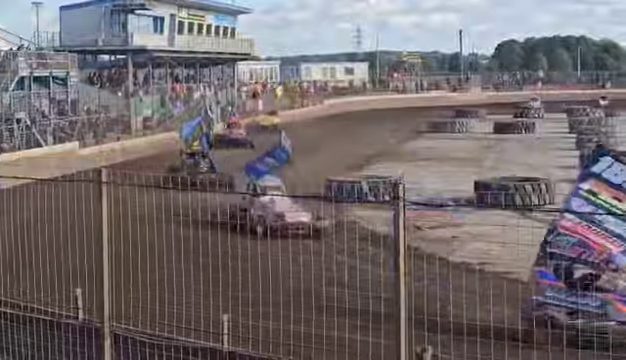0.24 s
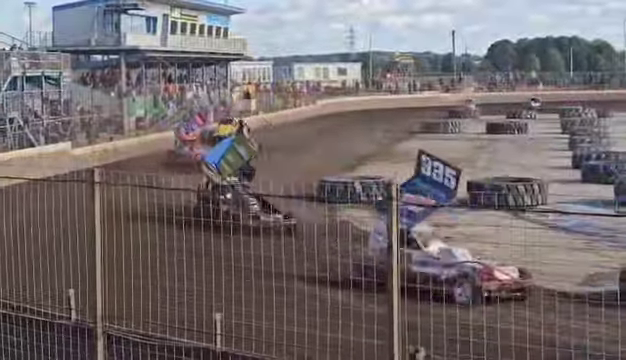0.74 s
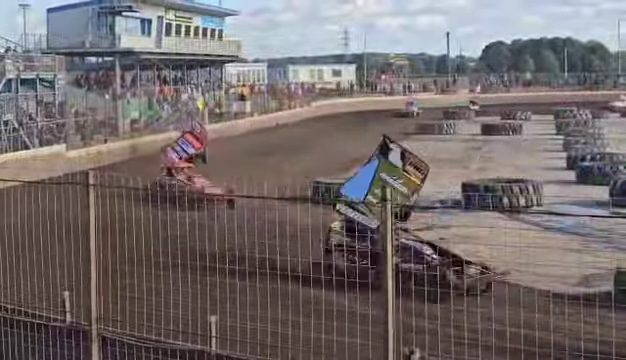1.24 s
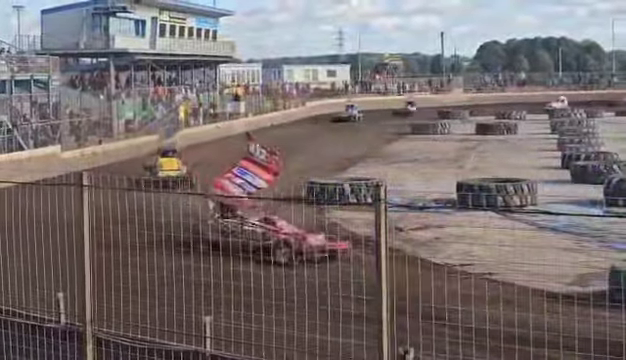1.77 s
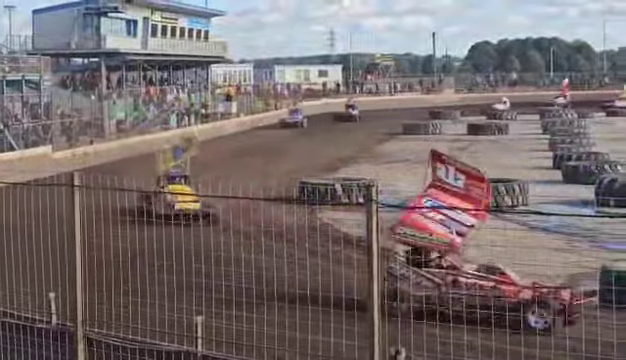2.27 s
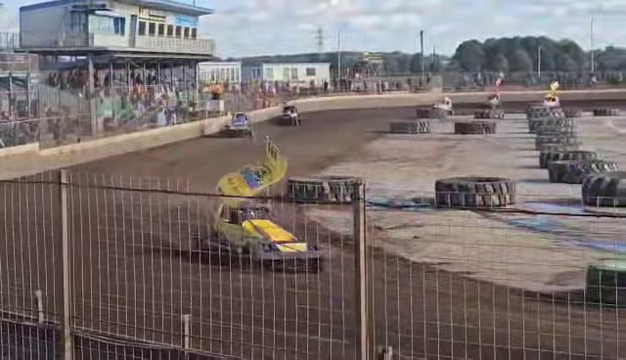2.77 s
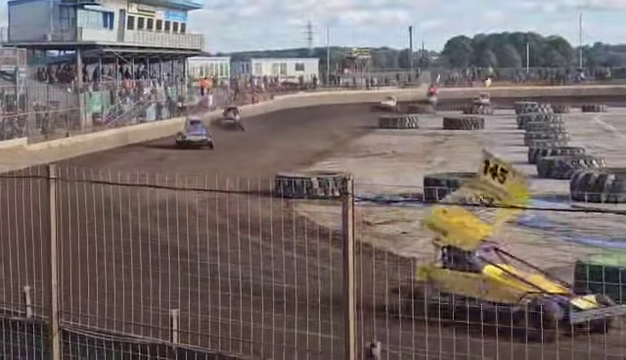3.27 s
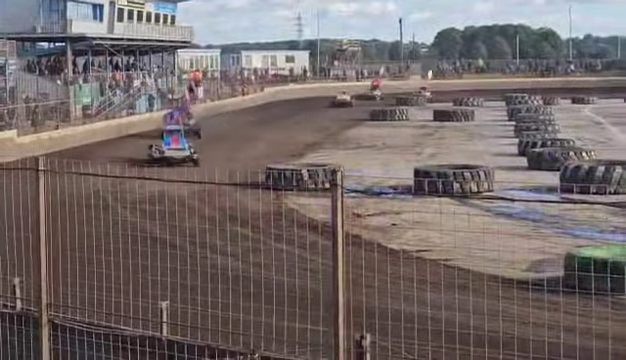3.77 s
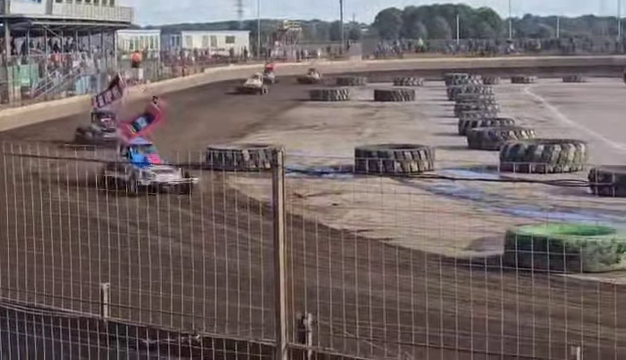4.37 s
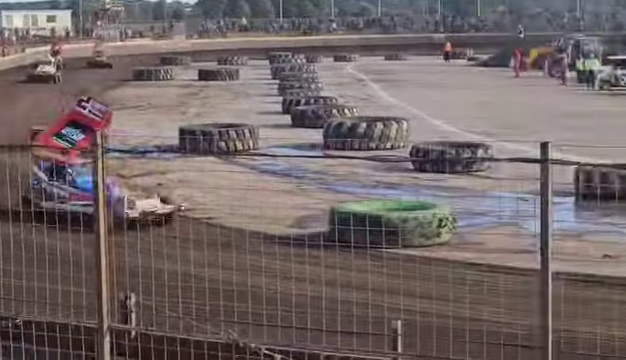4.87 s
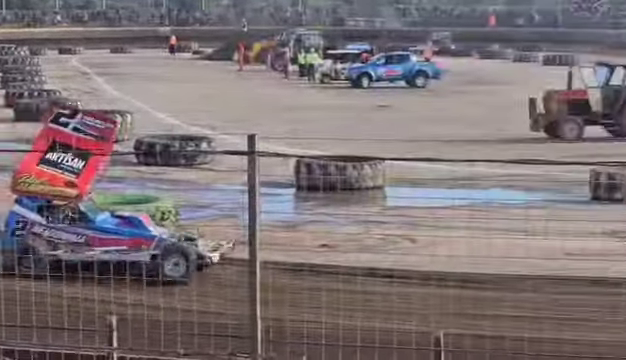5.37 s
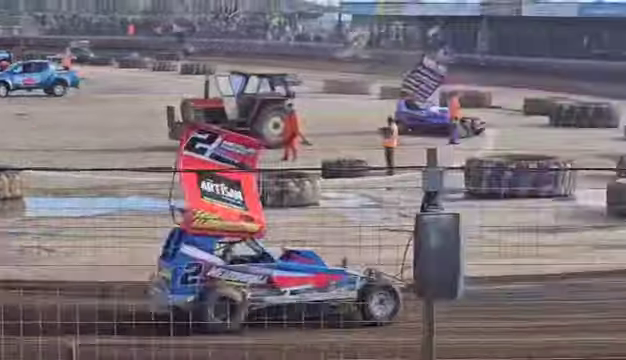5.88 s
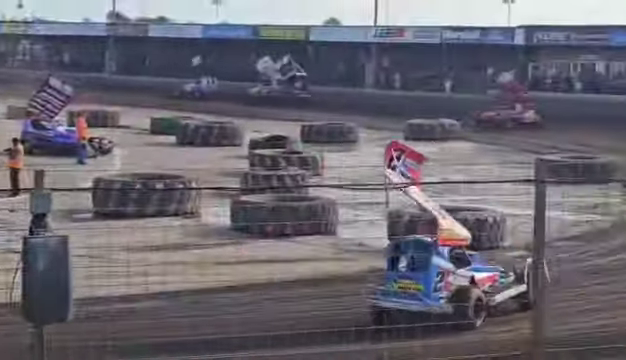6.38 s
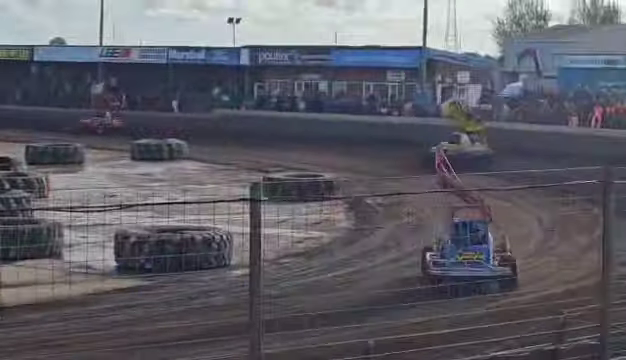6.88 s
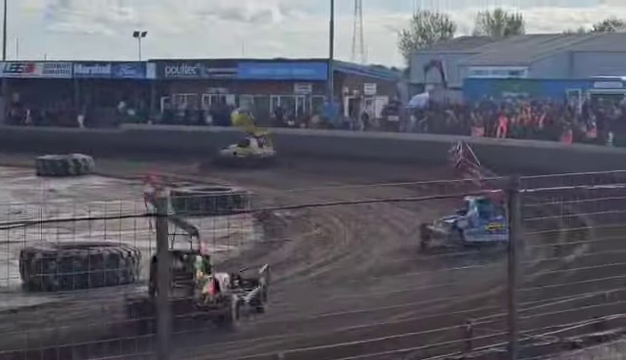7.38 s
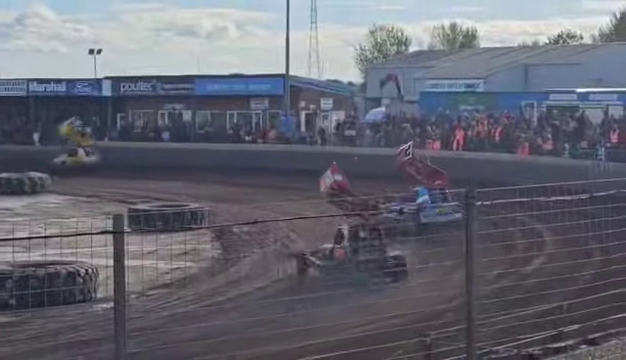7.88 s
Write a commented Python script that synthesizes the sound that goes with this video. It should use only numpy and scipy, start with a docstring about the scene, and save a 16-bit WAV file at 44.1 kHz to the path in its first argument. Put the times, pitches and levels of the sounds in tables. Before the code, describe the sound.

Loud V8 stock cars roar past one after another on a dirt oval, over the pack's steady drone, with hissing soil and stones ticking on a wire fence.

```python
"""First a V8 roars by against the drone of the pack: stock cars on a dirt oval, from behind the fence.
Eight cars come down the straight in turn, each a train of uneven firing pulses through its exhaust.
Many distant engines make the pack; close by, pulsed gas rasps and tyres throw hissing soil and grit.
Single stones tick on the wire, partials and low beats ring out, and the stands return a dull echo.
Two microphone ports hear it, with each engine reaching the nearer one first."""
import sys
import numpy as np
from scipy import signal
from scipy.fft import rfft, irfft, next_fast_len
from scipy.io import wavfile
from scipy.ndimage import uniform_filter1d, map_coordinates

SR = 44100
rng = np.random.default_rng(int(sys.argv[2]) if len(sys.argv) > 2 else 0)


def store_pcm(level_fs):
    """Save levels as 16-bit WAV."""
    pcm = np.round(np.clip(level_fs, -1, 1) * 32767).astype(np.int16)
    wavfile.write(sys.argv[1], SR, np.atleast_2d(pcm).T)


N = 358974

# near cars with both a note and ringing partials: [t/s, firing rate f/Hz, level/dB]
CAR_B = [(0, 243, -24), (0.55, 250, -18.5), (1.1, 230, -24), (1.3, 240, -19), (1.45, 212, -18),
         (1.62, 219, -19), (1.78, 255, -14.5), (1.92, 282, -19), (2.1, 291, -22)]
CAR_C = [(1.95, 358, -29), (2.17, 362, -25), (2.27, 413, -26), (2.37, 450, -25), (2.45, 432, -26),
         (2.53, 411, -31)]
CAR_D = [(2.15, 222, -19.5), (2.32, 245, -17), (2.5, 228, -21), (2.65, 245, -16.5), (2.78, 222, -19),
         (2.98, 222, -18.5), (3.15, 237, -21.5), (3.55, 228, -20.5), (3.78, 243, -16), (3.95, 232, -21)]
CAR_E = [(4.1, 224, -21), (4.3, 214, -20.5), (4.68, 214, -15), (5.12, 244, -15), (5.3, 233, -17.5),
         (5.55, 236, -17), (5.7, 243, -21)]
CAR_H = [(7.05, 408, -24), (7.3, 420, -22), (7.53, 382, -21), (7.68, 408, -21), (7.85, 421, -21),
         (8.14, 422, -21)]
# exhaust spectrum of a muffled car, near or far: [f/Hz, level/dB per Hz]
MUFFLED = [(30, -27), (60, -13.5), (95, -5.5), (140, 3), (235, 4.5), (320, -5.5), (480, -18), (800, -27.5),
           (1500, -36), (3000, -64), (10000, -87)]


def car(rows, pipe, abreast_s, snarl_db, jitter, uneven=0.4, scatter_db=0.1, tune=1,
        half_s=0.074, reach_s=0.9, mouth=None):
    """One near car: exhaust note plus snarl, and its bare firing pulses, strongest when abreast."""
    # usual resonances of the open pipes: [f/Hz, level/dB]
    open_mouth = [(330, -26), (470, 0), (650, -7), (850, -2), (1030, 2), (1220, -10), (1420, 0), (1600, -7),
                  (1850, -17), (2200, -13), (2800, -21), (4500, -16), (12000, -36)]
    if mouth is None:
        mouth = open_mouth
    hz, db = curves(rows)
    unsteady_hz = hz * (1 + 0.0025 * wobble(18))
    pulses = firings(unsteady_hz, uneven, scatter_db, jitter)
    flutter_db = 1.1 * wobble(16)
    note = amp(db + flutter_db) * levelled(ring(pulses, pipe)[0])
    exhaust = note + amp(snarl_db) * snarl(pulses, abreast_s, tune, half_s, mouth)
    nearness = 1 / (1 + ((np.arange(N) / SR - abreast_s) / reach_s) ** 4)
    return exhaust * presence(rows), np.maximum(pulses, 0) * nearness


def firings(hz, uneven, scatter_db, jitter):
    """One pulse per firing of a V8; the nearer bank is louder and unequal headers shift each cylinder."""
    # cylinder bank in firing order: [1 near or -1 far]
    bank = np.array([1, -1, -1, 1, -1, 1, 1, -1])
    # arrival shift of each cylinder's pulse: [firing intervals]
    header_shift = np.array([.1, -.07, .02, .12, -.11, .05, -.02, -.09])
    turns = np.cumsum(hz) / SR + rng.random()  # firings so far
    k = np.arange(1, int(turns[-1]))
    cylinder = k % len(bank)
    chance = rng.standard_normal((8192, 2))[k]
    firing = k + header_shift[cylinder] + jitter * chance[:, 0]
    at = np.interp(firing, turns, np.arange(N))
    size = (1 + uneven * bank[cylinder]) * amp(scatter_db * chance[:, 1])
    # each pulse is shared between the two samples around it
    whole, part = at.astype(int), at % 1
    pulses = np.bincount(whole, size * (1 - part), N + 1)
    pulses += np.bincount(whole + 1, size * part, N + 1)
    return pulses[:N] - pulses.mean()


def snarl(pulses, abreast_s, tune, half_s, mouth, slide=0.11, slide_s=0.15):
    """The open pipes point at the fence for a moment; their resonances slide down as the car goes by."""
    n = np.arange(N)
    since = n / SR - abreast_s
    shift = tune * (1 - slide * np.tanh(since / slide_s))
    # filtering in warped time, then unwarping, moves the resonances but not the firing rate
    car_time = np.cumsum(shift)
    car_time += abreast_s * SR - np.interp(abreast_s * SR, n, car_time)
    sent = ring(np.interp(n, car_time, pulses), mouth)[0]
    return np.interp(car_time, n, sent) / np.hypot(1, (since / half_s) ** 4)


def presence(rows, fade=0.28):
    """1 from a car's first row to its last, fading over fade seconds outside them."""
    t = np.arange(N) / SR
    inside = np.minimum(t - rows[0][0], rows[-1][0] - t)
    return np.clip(inside / fade + 1, 0, 1)


def blares(waver=0.003):
    """One partial of a car's exhaust rings out for a moment, gliding with its engine speed."""
    # ringing partials: [car, t/s, half length/s, multiple of firing rate, level/dB]
    partials = [(CAR_B, 1.34, .08, 2.2, -32), (CAR_C, 2.08, .08, 1.75, -29), (CAR_C, 2.13, .07, 1.875, -29),
                (CAR_C, 2.4, .11, 1, -20), (CAR_C, 2.44, .1, 1.625, -30), (CAR_D, 4.0, .12, 2.2, -33),
                (CAR_E, 5.64, .08, 2, -25), (CAR_H, 7.15, .075, 1, -24.5)]
    t = np.arange(N) / SR
    unsteady = 1 + waver * wobble(20)
    out = np.zeros(N)
    for rows, s, half_s, multiple, db in partials:
        on = np.abs(t - s) < 2 * half_s
        times, firing_hz, _ = np.transpose(rows)
        hz = multiple * np.interp(t[on], times, firing_hz) * unsteady[on]
        phase = 2 * np.pi * (np.cumsum(hz) / SR + rng.random())
        swell = np.exp(-0.5 * ((t[on] - s) / half_s) ** 4)
        out[on] += np.sqrt(2) * amp(db) * swell * np.sin(phase)
    return out


def rasp(flow, close):
    """Turbulent gas leaves the pipes in step with the firings."""
    # gas noise: [f/Hz, level/dB per Hz]
    gas_spectrum = [(350, -54.5), (650, -0.5), (850, 1), (1050, 2), (1230, -2), (1420, -1.5), (1700, -8.5),
                    (2100, -8.5), (2700, -22), (4500, -16), (9000, -70)]
    gas = ring(spread(flow * rng.standard_normal((2, N))), gas_spectrum, size=512)
    far_gain = amp(-37.5)  # the rest of the field, always there
    return np.hypot(far_gain, close) * clumps(gas, depth_db=1.8, size=1024)


def throb(pulses, puff_s=0.0016, steady=0.8):
    """Gas flow of the nearest car, at rms 1: a puff for each firing over a steady rush."""
    puffs = signal.lfilter([1], [1, -np.exp(-1 / (puff_s * SR))], pulses) + 1e-9
    flow = puffs / np.abs(uniform_filter1d(puffs, SR // 10)) + steady
    return levelled(flow)


def passing(fall=1.8):
    """Gain of the cars going by: each swells as it nears and falls away behind."""
    # cars sweeping past the fence: [nearest t/s, approach/s, departure/s, level/dB]
    sweeps = [(0.02, 0.1, 0.13, -30.5), (0.58, 0.12, 0.12, -36), (1.27, 0.1, 0.1, -31.5),
              (2.3, 0.45, 0.1, -30), (3.38, 0.13, 1, -37.5), (4.45, 0.1, 0.2, -35),
              (5.6, 0.41, 0.39, -32.5), (6.1, 0.021, 0.56, -35), (7.4, 0.82, 0.13, -29),
              (8.14, 0.16, 0.2, -35.5)]
    t = np.arange(N) / SR
    power = np.zeros(N)
    for s, approach, departure, db in sweeps:
        away = np.abs(t - s) / np.where(t < s, approach, departure)
        power += amp(db) ** 2 / (1 + away ** fall) ** 2
    return np.sqrt(power)


def dirt(close, lumpy_db=-24):
    """Spinning tyres throw a hiss of soil and sharper grit, lumpier as the grit gets louder."""
    # soil hiss and sharp grit: [f/Hz, level/dB per Hz]
    soil_spectrum = [(1200, -40.5), (2000, -8.5), (2700, -3), (3300, 1.5), (4300, 2), (5200, 2), (6200, -4),
                     (8000, -6), (13000, -25.5)]
    gravel_spectrum = [(2500, -44), (4500, 1), (6000, 0), (7300, 4), (8500, -3.5), (10300, -6),
                       (11400, -0.5), (12200, -2), (13200, -17)]
    far_spray_db, far_grit_db = -41.5, -49.5  # the rest of the field, always there
    pass_spray_db, pass_grit_db = -6.5, -23.5  # a passing car, against its rasp
    thrown_spray, thrown_grit = showers()
    spray = np.sqrt(amp(far_spray_db) ** 2 + (amp(pass_spray_db) * close) ** 2 + thrown_spray ** 2)
    grit = np.sqrt(amp(far_grit_db) ** 2 + (amp(pass_grit_db) * close) ** 2 + thrown_grit ** 2)
    lumpy = np.sqrt(np.minimum(grit / amp(lumpy_db), 1))
    soil = clumps(ring(spread(grains(9000, 0.27)), soil_spectrum), depth_db=2.5)
    gravel = clumps(ring(spread(grains(3500, 1)), gravel_spectrum), depth_db=3.5, size=512)
    spray_sound = spray * amp(0.8 * lumpy * wobble(45)) * soil
    grit_sound = grit * amp(1.6 * lumpy * wobble(160)) * gravel
    return spray_sound + grit_sound


def showers(attack_s=0.025, release_s=0.03):
    """Gains of spray and grit: each shower from sliding tyres rises, holds and settles."""
    # showers of dirt: [start t/s, length/s, spray level/dB, grit level/dB]
    throws = [(0, 0.072, -46, -28.5), (0.162, 0.17, -44, -37), (0.492, 0.23, -49, -33.5),
              (1.295, 0.62, -47, -39), (1.738, 0.22, -54, -29.5), (2.068, 0.22, -31, -25.5),
              (2.292, 0.013, -25.5, -24.5), (2.388, 0.092, -32, -24.5), (2.706, 0.29, -69, -42),
              (3.723, 0.26, -39.5, -44.5), (5.189, 0.3, -38, -43), (5.346, 0.057, -35.5, -35),
              (5.489, 0.04, -36, -30.5), (5.584, 0.32, -34, -30), (5.968, 0.46, -31.5, -42),
              (6.862, 0.18, -35, -42), (7.083, 0.17, -30, -33), (7.279, 0.1, -27, -27),
              (7.485, 0.056, -27.5, -32.5)]
    t = np.arange(N) / SR
    power = np.zeros((2, N))
    for s, length, spray_db, grit_db in throws:
        outside = np.maximum(s - t, 0) / attack_s + np.maximum(t - s - length, 0) / release_s
        gains = amp([[spray_db], [grit_db]]) * np.exp(-np.minimum(outside, 20))
        power += gains ** 2
    return np.sqrt(power)


def grains(rate, scatter_db):
    """Random impacts of uneven size on two channels, rate a second in each, at rms 1."""
    hit = rng.random((2, N)) < rate / SR
    size = rng.standard_normal((2, N)) * amp(scatter_db * rng.standard_normal((2, N)))
    return unit(hit * size)


def stones(t60=0.012, ring_hz=7400, hz_scatter=0.2):
    """Single stones tick against the wire fence, each with a brief ring of its own."""
    # stone hits: [t/s, level/dB before the 6 dB lift and the wire]
    hits = [(0.2866, -27), (0.2979, -16), (1.652, -27), (1.666, -27), (1.725, -19), (1.7375, -14),
            (1.8015, -20), (1.8416, -23), (1.9063, -14), (2.0933, -20), (2.105, -17), (2.116, -19),
            (2.174, -18), (2.2025, -21), (2.279, -18), (2.2982, -19), (2.4243, -19), (2.4795, -17),
            (5.3485, -25), (6.0072, -24), (6.031, -24), (6.1882, -24), (6.2424, -19), (6.295, -23),
            (6.394, -24), (7.082, -23), (7.2152, -22), (7.263, -21), (7.3726, -17)]
    # response of the fence wire: [f/Hz, level/dB]
    wire_response = [(2500, -40), (4500, -3), (7300, 1.5), (9000, -4), (11400, -2.5)]
    t = np.arange(SR // 10) / SR
    ticks = np.zeros((2, N))
    for s, db in hits:
        own_hz = ring_hz * np.exp(hz_scatter * rng.uniform(-1.23, 1))
        wire = np.sin(2 * np.pi * own_hz * t)
        tick = (0.35 * wire + rng.standard_normal((2, len(t)))) * amp(-60 * t / t60)
        ticks[:, round(s * SR):][:, :len(t)] += amp(db + 6) * tick
    heard = filtered(ticks, lambda hz: amp(along(wire_response, hz)))
    return heard * amp([[-3], [0]])  # left is 3 dB down


def far_car(rows):
    """A car further back in the pack: only its muffled note carries."""
    hz, db = curves(rows)
    pulses = firings(hz, uneven=0.26, scatter_db=3.5, jitter=0.02)
    note = levelled(ring(pulses, MUFFLED)[0])
    return amp(db + 2.3 * wobble(14)) * presence(rows) * note


def boom(waver=0.011, flutter_db=1.5, fade_s=0.26):
    """A low beat from the uneven cylinder banks carries furthest, climbing as each car gathers speed."""
    # cars pulling out of a bend: [start t/s, end t/s, first f/Hz, last f/Hz, peak level/dB]
    pulls = [(0, 1.105, 88.9, 108.5, -19.5), (1.093, 1.946, 78.45, 84.3, -21.5),
             (2.254, 2.863, 88.1, 96.5, -18.5), (3.214, 4.306, 90, 103.3, -21.5),
             (6.048, 7.053, 87.9, 102.8, -25.5)]
    beats = np.zeros(N)
    for start, end, first_hz, last_hz, db in pulls:
        climb = [(start, first_hz), (end, last_hz)]
        hz = curves(climb)[0] * (1 + waver * wobble(15))
        phase = 2 * np.pi * np.cumsum(hz) / SR
        beats += amp(db) * presence(climb, fade_s) * np.sin(phase)
    return amp(flutter_db * wobble(16)) * beats


def pack(close, dip_s=5.84, dip_half_s=0.067, deepest_db=-41):
    """The pack's exhausts merge into a rumble, a drone and a broken bark that grows as cars come close."""
    # the three bands before the trims below: [t/s, rumble level/dB, drone level/dB, bark level/dB]
    band_levels = [(0, -19, -11.5, -28.5), (1.4, -16.5, -12, -24), (2.3, -14, -8.5, -24.5),
                   (2.85, -18, -9.5, -25), (4.1, -16.5, -11, -20), (5.3, -17, -11, -22),
                   (6.3, -22.5, -12.5, -28), (7.2, -19.5, -12.5, -31), (8.14, -20.5, -11.5, -22)]
    # spectra of the bands: [f/Hz, level/dB per Hz]
    rumble_spectrum = [(15, -62), (30, -38), (45, -3.5), (62, -12), (90, -7), (125, 0), (170, -14),
                       (300, -71.5), (2000, -100)]
    drone_spectrum = [(70, -35), (120, -0.5), (155, -14), (200, 3.5), (250, 6.5), (300, -4), (380, -25.5),
                      (700, -43.5), (4000, -106)]
    bark_spectrum = [(200, -45.5), (320, 0.5), (420, -2), (520, 0), (680, -4), (850, -16.5), (1400, -25.5),
                     (3000, -92.5)]
    rumble_db, drone_db, bark_db = curves(band_levels)
    # rumble and drone dip briefly
    dip_db = deepest_db * np.exp(-((np.arange(N) / SR - dip_s) / dip_half_s) ** 2)
    engines = spread(np.array([field(245) + field(180), field(215)]))
    rumble = amp(rumble_db + dip_db - 4.0) * ring(engines, rumble_spectrum)
    drone = amp(drone_db + dip_db - 8.5) * ring(engines, drone_spectrum)
    bark = clumps(ring(engines, bark_spectrum), depth_db=2, size=2048)
    bark_gain = np.hypot(amp(bark_db - 4), amp(5) * close)  # passing bark: 5 dB over the rasp
    return rumble + drone + bark_gain * bark


def field(firing_hz, count=3):
    """Cars further round the track, each on its own throttle."""
    engines = np.zeros(N)
    for _ in range(count):
        hz = firing_hz * np.exp(0.15 * wobble(0.8) + 0.003867 * wobble(9))
        engines += firings(hz, uneven=0.7, scatter_db=2.2, jitter=0.03)
    return unit(engines)


def stands(x, delay=0.03):
    """The stands and the track wall send back a dull, diffuse echo: late noise whose treble dies first."""
    # echo decay: [f/Hz, t60/s]
    decay = [(100, 0.5), (1000, 0.37), (5000, 0.098), (13000, 0.086)]
    hz, t, z = signal.stft(rng.standard_normal((2, SR)), SR, nperseg=256)
    fade = amp(-60 * t / along(decay, hz)[:, None])
    tail = signal.istft(z * fade, SR, nperseg=256)[1]
    late = np.pad(x, (int(delay * SR), 0))[None]
    return spread(signal.fftconvolve(late, tail / np.linalg.norm(tail[0]), axes=1)[:, :N])


def thud(level_db=-36):
    """A dull, deep rumble of slowly wavering noise arrives from all round the track."""
    # deep noise: [f/Hz, level/dB per Hz]
    deep_spectrum = [(12, -33), (25, -14), (38, -5), (48, -3), (62, -3), (90, -11), (400, -96)]
    air = ring(spread(rng.standard_normal((2, N))), deep_spectrum)
    return amp(level_db + 0.89 * wobble(3.5)) * air


def steer(pair):
    """The sound reaches the nearer microphone port first."""
    # direction of the loudest cars: [t/s, lag of the left port/ms]
    bearing = [(0, 0.28), (0.7, 0.39), (1.4, 0.44), (2.3, -0.019), (2.8, 0.42), (5.25, 0.37), (6.2, -0.28),
               (8.14, -0.03)]
    lag = curves(bearing)[0] * SR / 1000  # samples
    left, right = pair
    n = np.arange(N)
    return np.array([map_coordinates(left, [n - lag / 2]), map_coordinates(right, [n + lag / 2])])


def spread(pair):
    """Two unrelated signals to left and right: alike in the bass, less so in the treble."""
    # left-right likeness: [f/Hz, correlation 0-1]
    alike = [(100, 0.99), (300, 0.87), (700, 0.45), (1500, 0.42), (4000, 0.29), (12000, 0.048)]

    def mid_side(hz):
        turn = np.arccos(np.clip(along(alike, hz), -1, 1)) / 2
        return np.array([np.cos(turn), np.sin(turn)])

    mid, side = filtered(pair, mid_side)
    return np.array([mid + side, mid - side])


def clumps(x, depth_db, size=256):
    """Sound comes in patches of time and pitch, each with its own strength and colour; rms 1."""
    z = signal.stft(x, nperseg=size)[2]
    patches = rng.standard_normal(z.shape[1:])
    patches = uniform_filter1d(patches, size=7, axis=0)
    patches = uniform_filter1d(patches, size=9, axis=1)
    return unit(signal.istft(z * amp(depth_db * unit(patches)), nperseg=size)[1][:, :N])


def ring(x, spectrum, size=4096):
    """x through a causal (minimum-phase) body with this spectrum, at rms 1."""
    cepstrum = irfft(np.log(amp(along(spectrum, np.fft.rfftfreq(size, 1 / SR)))))
    # folding the cepstrum forward makes the body ring only after each pulse
    cepstrum[1:size // 2] *= 2
    cepstrum[size // 2 + 1:] = 0
    body = irfft(np.exp(rfft(cepstrum)))
    return unit(signal.oaconvolve(np.atleast_2d(x), body[None], axes=1)[:, :N])


def filtered(x, response):
    """x times a response of frequency."""
    m = next_fast_len(N + SR // 4, True)
    return irfft(rfft(x, m) * response(np.fft.rfftfreq(m, 1 / SR)), m)[..., :N]


def levelled(x, size=4096):
    """x held at rms 1 from moment to moment."""
    return x / np.sqrt(np.abs(uniform_filter1d(x ** 2, size)) + 1e-12)


def wobble(rate):
    """A smooth random curve, rate knots a second."""
    knots = rng.standard_normal(int(N * rate / SR) + 4)
    coarse = np.linspace(0, N, 4096)
    return np.interp(np.arange(N), coarse, map_coordinates(knots, [coarse * rate / SR]))


def curves(rows):
    """One value per sample for each column after the time."""
    s, *cols = np.transpose(rows)
    return [np.interp(np.arange(N) / SR, s, c) for c in cols]


def along(points, hz):
    """(Hz, value) points on a log axis."""
    f, v = np.transpose(points)
    return np.interp(np.log(hz + 1), np.log(f + 1), v)


def amp(db):
    """Decibels to gain."""
    return 10 ** (np.asarray(db) / 20)


def unit(x):
    """Scale to rms 1."""
    return x / np.sqrt(np.mean(x ** 2) + 1e-20)


def scene():
    """Near cars, the pack, flying dirt and the echo."""
    # more near cars: [t/s, firing rate f/Hz, level/dB]
    car_a = [(0, 256, -15.5), (0.16, 257, -16), (0.32, 244, -16.5), (0.55, 272, -21), (0.78, 280, -23),
             (0.95, 321, -21), (1.12, 308, -27)]
    car_f = [(5.6, 186, -21), (5.72, 196, -17), (5.88, 222, -15), (5.94, 220, -17)]
    car_g = [(6.05, 240, -28), (6.2, 280, -22.5), (6.43, 336, -17.5), (6.55, 318, -19.5), (6.7, 283, -20),
             (7.0, 262, -25)]
    # cars further back, one list each: [t/s, firing rate f/Hz, level/dB]
    far_cars = [
        [(0.65, 180.8, -21), (0.8, 168.2, -19.5), (1.15, 183.2, -24), (1.3, 200.6, -18)],
        [(4.95, 275, -30), (5.3, 292.4, -21), (5.55, 313.6, -24.5)],
    ]
    # exhaust spectra: [f/Hz, level/dB per Hz]
    open_pipe = [(55, -3), (210, -1), (320, -7), (440, 11), (620, 7), (800, 3.5), (1400, -16), (2500, -24),
                 (4000, -68)]
    boomy_pipe = [(120, -18.5), (160, 5), (210, 4), (265, -12.5), (340, -24), (430, -11), (600, -25),
                  (800, -23), (10000, -83)]
    throaty_pipe = [(60, -18), (160, 3), (255, 3), (320, -12), (415, -7), (580, -6), (720, -17),
                    (1400, -30), (10000, -76)]
    # resonances of the last car's open pipes: [f/Hz, level/dB]
    wail = [(330, -26), (470, -6), (820, -11), (940, 2), (1030, 5), (1230, -14), (1420, -1), (1720, -8),
            (2800, -16), (12000, -44)]
    near, pulses = np.sum([
        car(car_a, MUFFLED, abreast_s=0.022, snarl_db=-55, jitter=0.03, uneven=0.15),
        car(CAR_B, MUFFLED, abreast_s=1.26, snarl_db=-34, jitter=0.023),
        car(CAR_C, open_pipe, abreast_s=2.385, snarl_db=-23, jitter=0.01, uneven=0.7,
            scatter_db=1.2, half_s=0.125),
        car(CAR_D, MUFFLED, abreast_s=3.35, snarl_db=-44, jitter=0.012, uneven=0.25),
        car(CAR_E, MUFFLED, abreast_s=5.6, snarl_db=-27.5, jitter=0.008, uneven=0.2,
            scatter_db=0.7, tune=1.02, half_s=0.15),
        car(car_f, MUFFLED, abreast_s=5.84, snarl_db=-33, jitter=0.006, uneven=0.2),
        car(car_g, boomy_pipe, abreast_s=6.25, snarl_db=-32, jitter=0.005, uneven=0.8,
            scatter_db=0.7, tune=0.82, half_s=0.27),
        car(CAR_H, throaty_pipe, abreast_s=7.39, snarl_db=-25.5, jitter=0.045, uneven=0.75,
            scatter_db=2.4, tune=0.92, half_s=0.19, mouth=wail)], axis=0)
    close = passing()
    further = sum(far_car(rows) for rows in far_cars)
    notes = near + blares() + further + boom()
    engines = steer(notes + pack(close) + rasp(throb(pulses), close))
    echo = amp(-17.0) * stands(near)
    return engines + thud() + echo + steer(dirt(close)) + stones()


def record(dry):
    """The two microphone ports differ in the treble; nothing is kept above the band limit."""
    # microphone ports: [f/Hz, left minus right level/dB]
    ports = [(200, 0.8), (1200, 0.8), (2200, 0), (4000, -1.5), (7000, -6), (12000, -1)]
    top_hz = 13200
    heard = filtered(dry, lambda hz: amp(along(ports, hz) * np.array([[0.5], [-0.5]])))
    return filtered(heard, lambda hz: 1 / (1 + (hz / top_hz) ** 120))


dry = scene()
out = record(dry)
store_pcm(out)
```